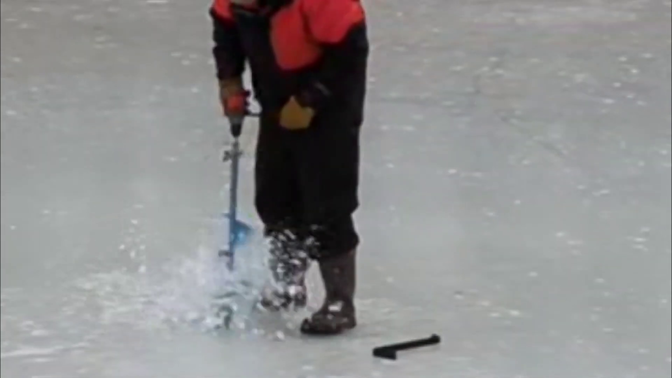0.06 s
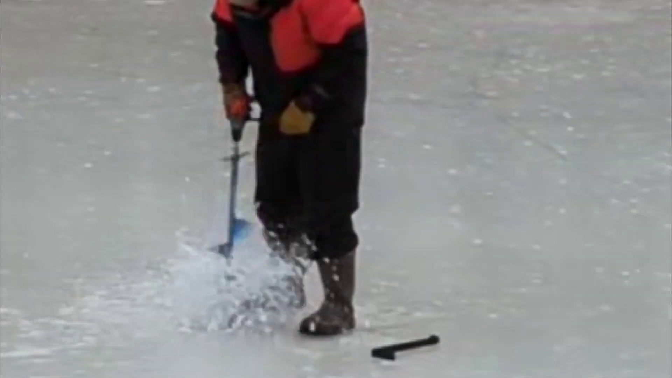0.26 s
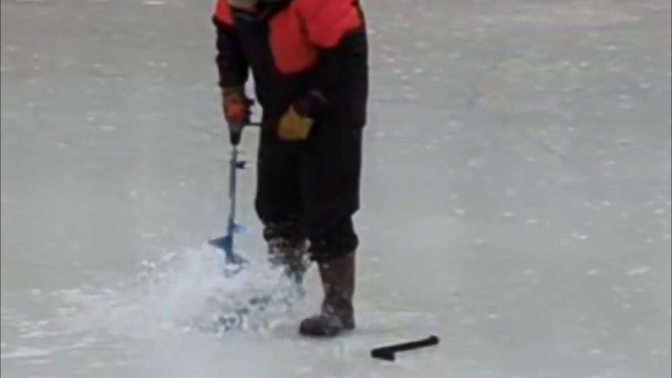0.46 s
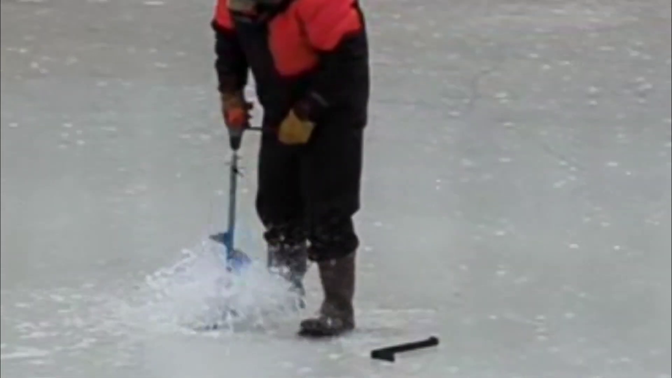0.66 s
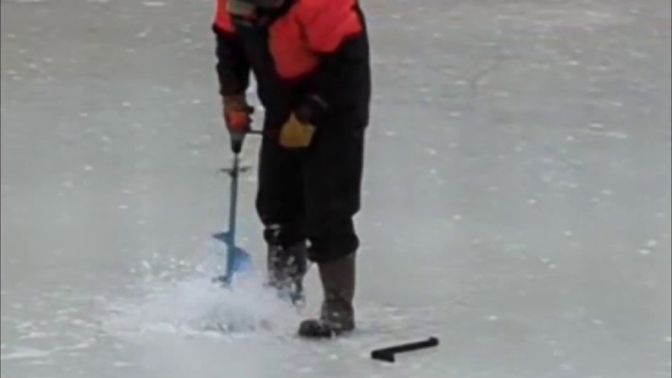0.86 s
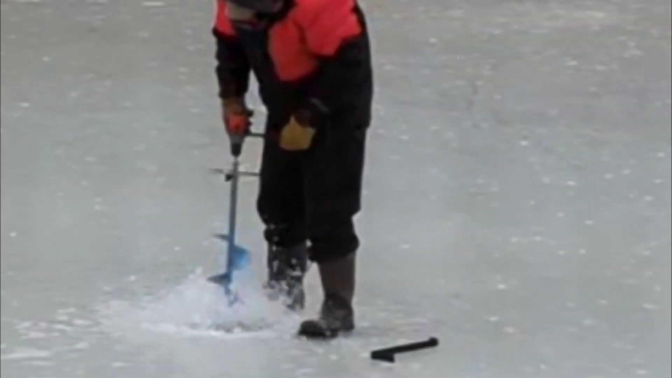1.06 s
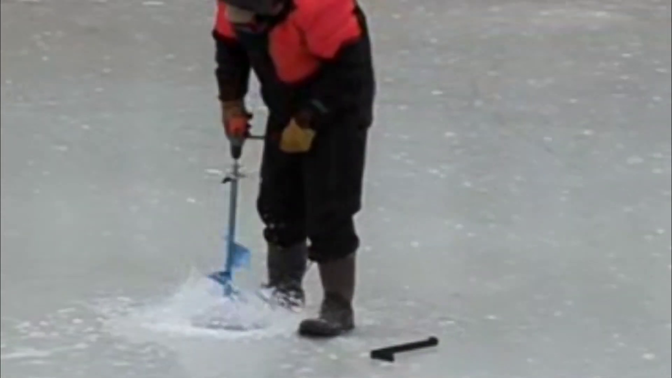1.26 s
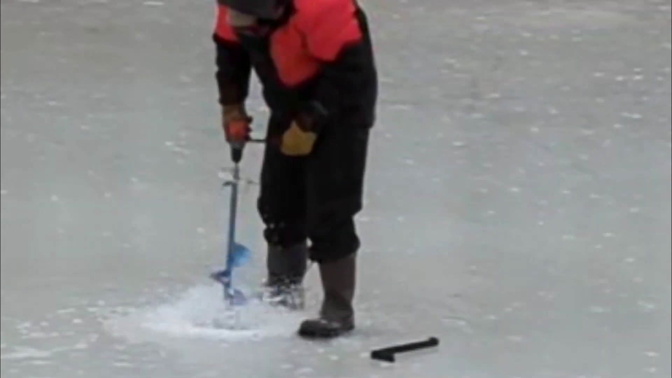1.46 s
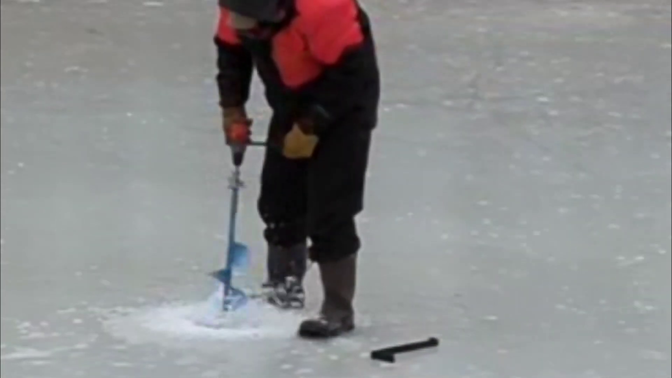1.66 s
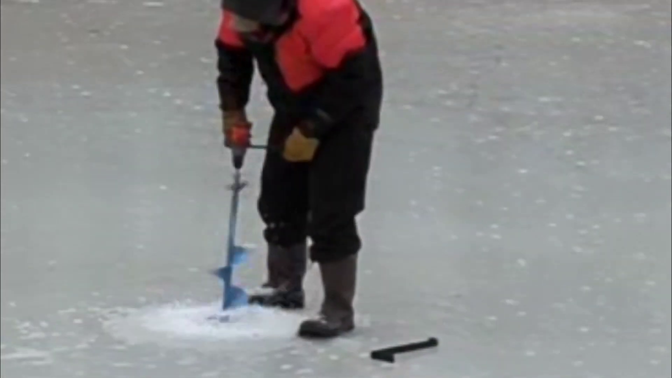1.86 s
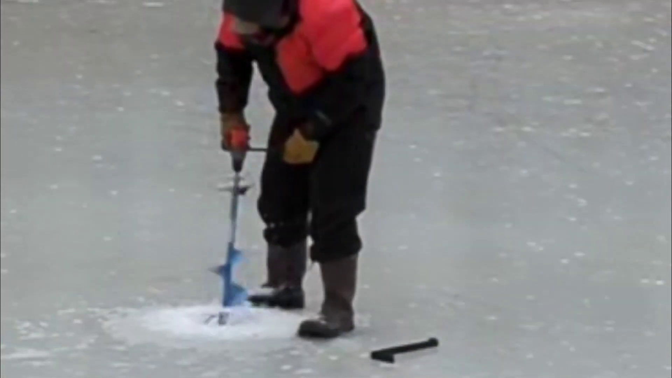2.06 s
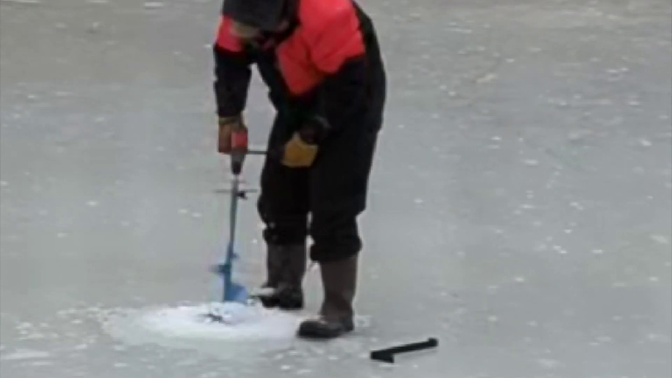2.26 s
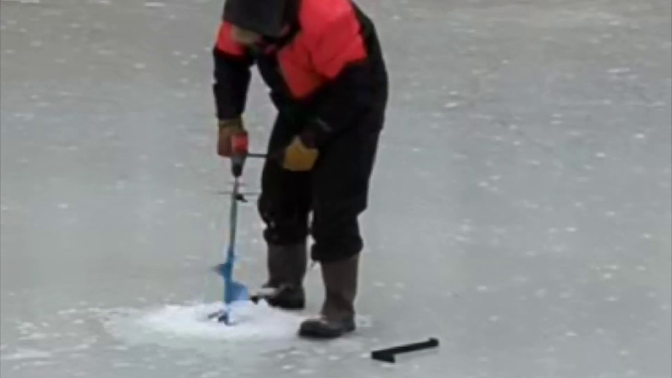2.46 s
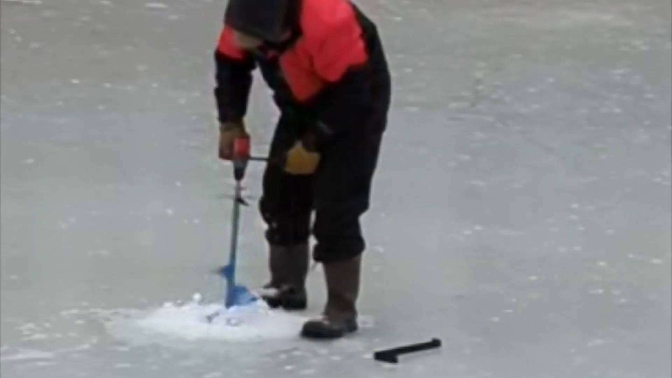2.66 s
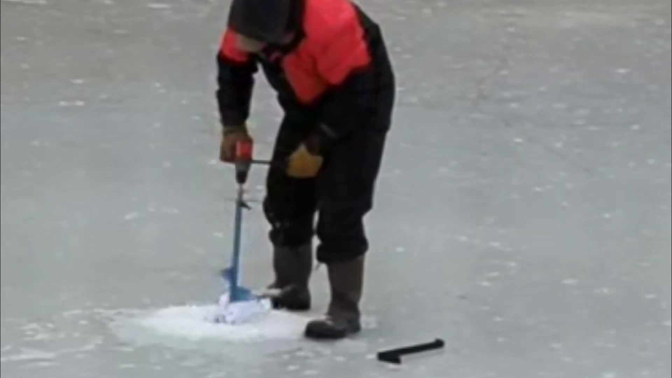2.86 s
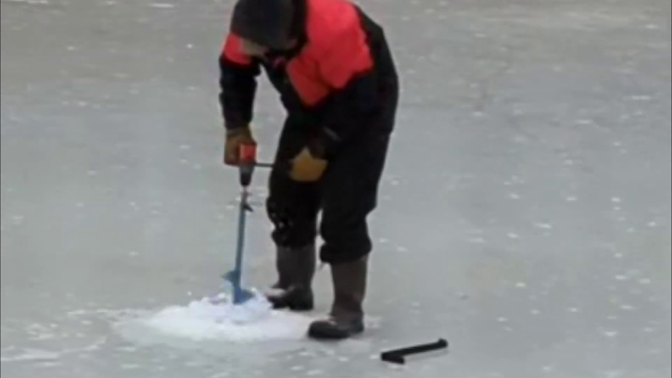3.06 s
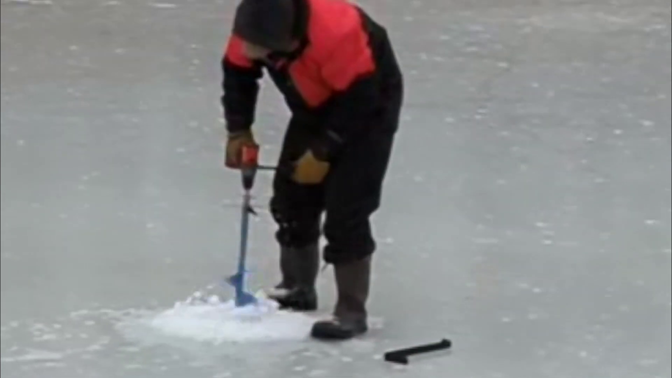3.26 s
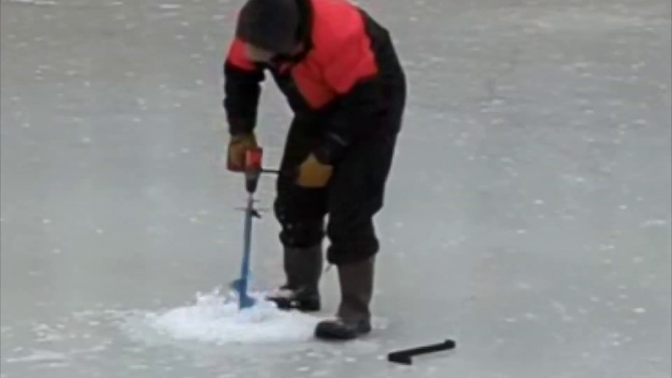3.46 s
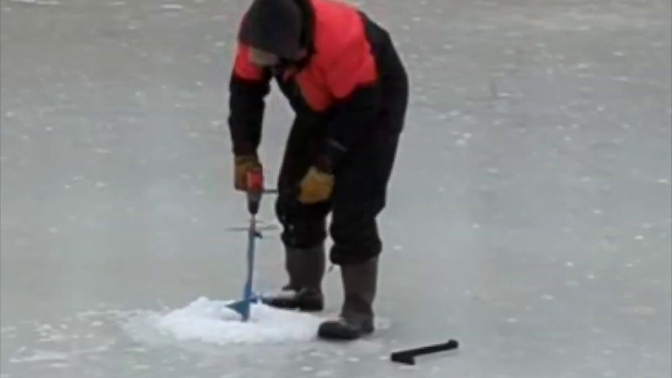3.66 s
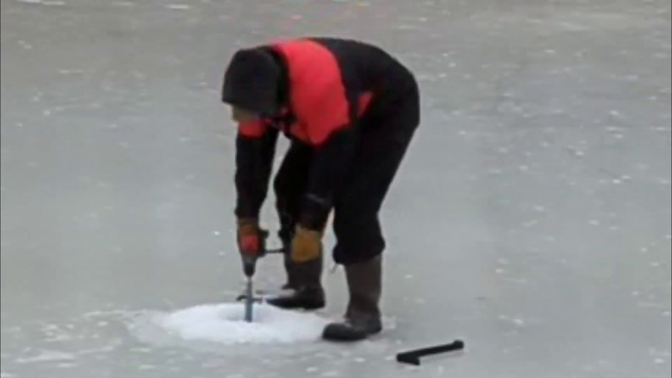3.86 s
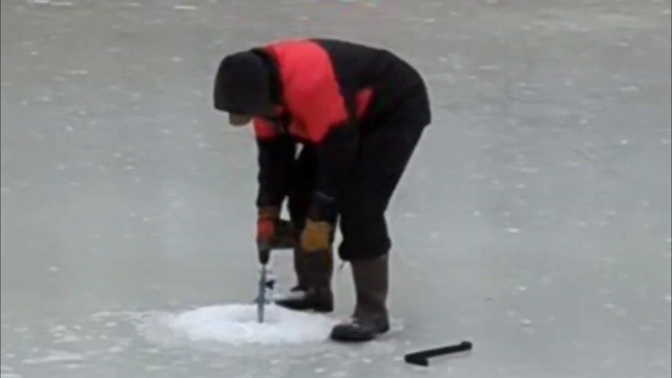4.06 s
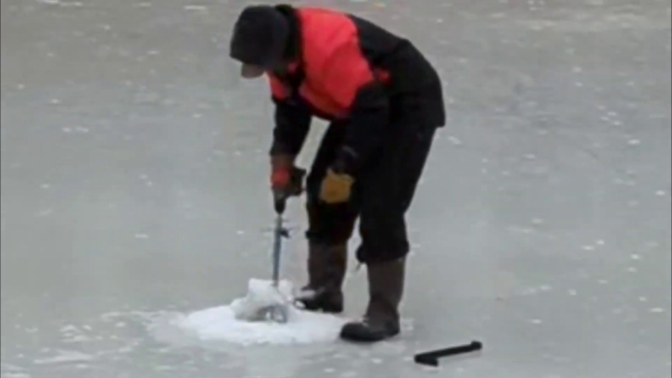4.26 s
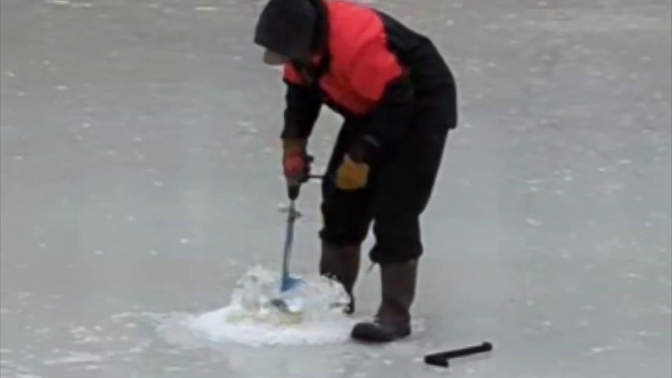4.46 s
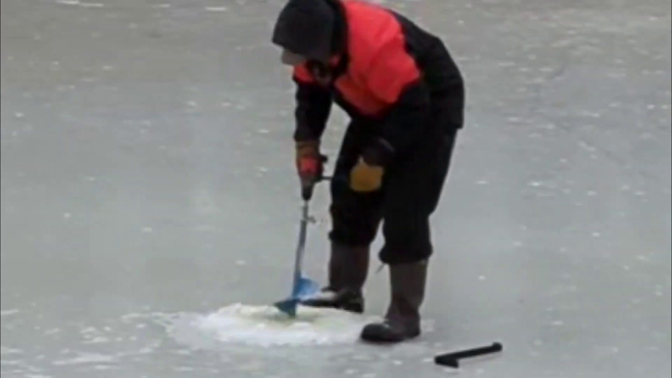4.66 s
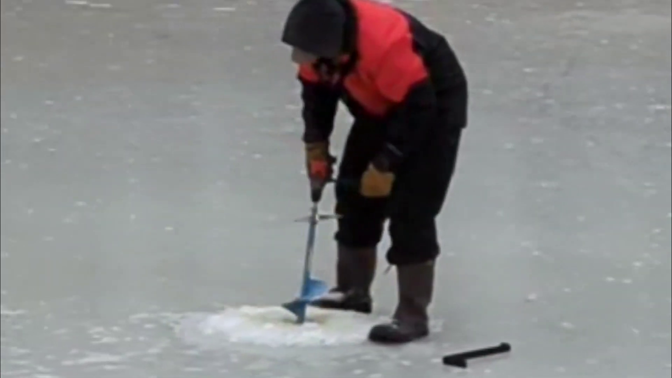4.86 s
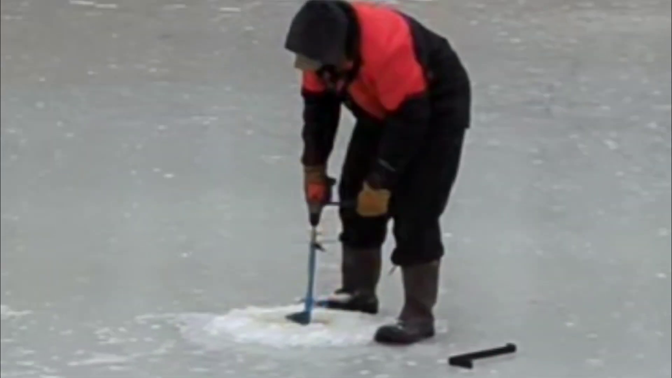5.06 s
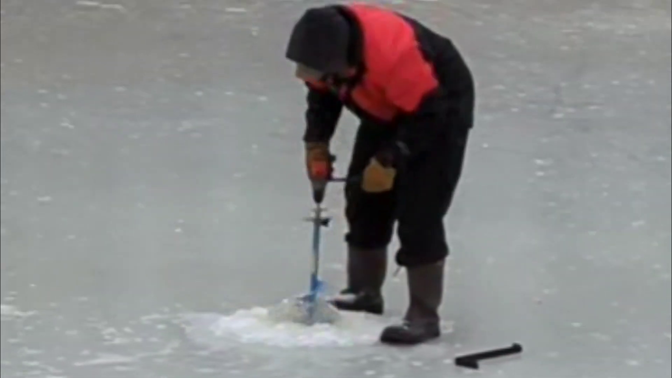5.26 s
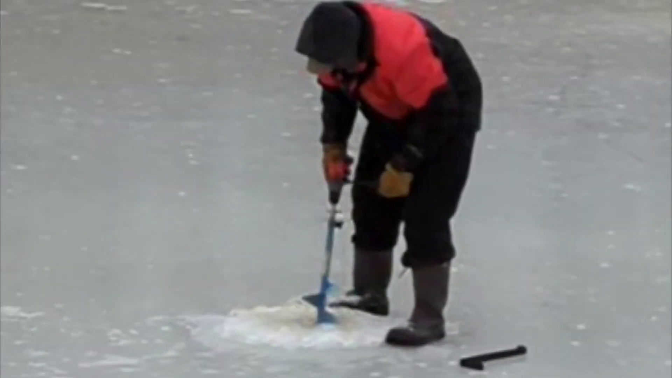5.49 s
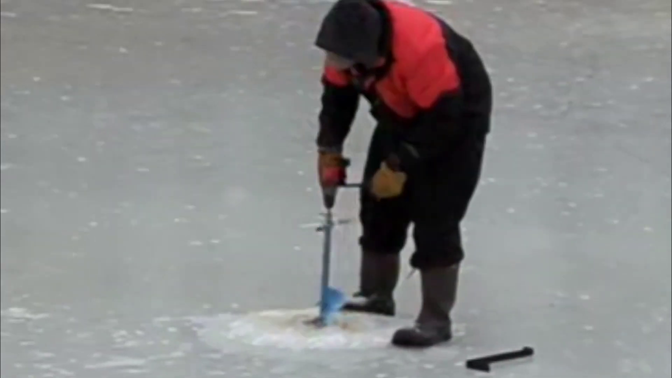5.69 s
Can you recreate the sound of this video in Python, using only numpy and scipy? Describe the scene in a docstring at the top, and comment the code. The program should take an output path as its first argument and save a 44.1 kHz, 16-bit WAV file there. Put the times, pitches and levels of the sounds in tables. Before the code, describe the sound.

Outdoors on a frozen lake, an electric auger grinds crisply through ice, punches through, then churns water in two short splashing bouts.

```python
"""A cordless drill turns an auger through lake ice, a few metres from a stereo microphone.
Geared tones ring the drill's case; the blades shave ice as showers of tiny fractures, with ringing flights.
The deepening hole knocks and resonates lower and lower, until the auger breaks through with a boom.
The freed auger then throws up water in two bouts: swelling gulps, noisy slush, clinks of the steel.
The open lake lies behind it all as a low filtered noise, and ice and shore return a sparse echo."""
import sys
import numpy as np
from scipy import signal
from scipy.fft import rfft, irfft
from scipy.io import wavfile
from scipy.ndimage import uniform_filter1d

SR = 44100
rng = np.random.default_rng(int(sys.argv[2]) if len(sys.argv) > 2 else 0)


def unload_wav(signal):
    """Save mono or channel-first audio to the path in sys.argv[1] as 16-bit WAV at rate SR, clipped to [-1, 1]."""
    wavfile.write(
        sys.argv[1],
        SR,
        np.round(np.clip(np.atleast_2d(signal).T, -1, 1) * 32767).astype(np.int16),
    )


N = 252693
T = np.arange(N) / SR
BREAKTHROUGH_S = 3.78
TEETH = 11  # gear mesh cycles per turn of the motor shaft

# colour of low grinding and sloshing: (frequency [Hz], relative level [dB])
GRIND_COLOUR = [(30, -39), (60, -29), (120, -7), (200, -31), (260, -18), (330, -2), (415, 4.5), (500, 4.5),
                (565, -8), (630, 3.5), (725, 5.5), (810, -9), (900, -12.5), (1200, -3.5), (2000, -40.5)]
# colour of cracking ice: (frequency [Hz], relative level [dB])
CRACK_COLOUR = [(1000, -13), (3000, -4), (4200, -4), (5400, 6), (6600, -1), (8000, 0.5), (10200, -8),
                (11200, -27), (12100, -20), (15000, -38)]
# modes of the auger's steel: (frequency [Hz], relative level [dB], t60 before wet damping [s])
STEEL_MODES = [(2720, -0.5, 0.42), (3420, -7, 0.85), (4054, -1, .75), (4760, -8.5, 0.72),
               (5050, -3.5, 0.35), (5660, -4.5, 0.49), (5930, 6.5, 0.066), (7486, 7.5, 0.27),
               (8200, -4, 0.61), (8064, -6, 0.26), (8230, -10, 0.35), (8570, -5.5, 0.39), (9430, -2, 0.3),
               (10210, -4.5, 0.42), (12030, -2, 0.087)]


def amp(db):
    """Decibels to amplitude."""
    return 10 ** (np.asarray(db) / 20)


def unit(x):
    """Scales to rms 1."""
    return x / np.sqrt(np.mean(x ** 2) + 1e-20)


def read(points, hz):
    """A spectrum table on a log-frequency axis."""
    f, value = np.transpose(points)
    return np.interp(np.log(hz + 1), np.log(f + 1), value)


def curves(rows):
    """The columns of a time table, one value per sample."""
    s, *columns = np.transpose(rows)
    return [np.interp(T, s, c) for c in columns]


def lapse(s):
    """Seconds since s, zero before it."""
    return np.maximum(T - s, 0)


def during(start, end):
    """1 from start to end, with soft edges."""
    return uniform_filter1d(1. * ((T >= start) & (T <= end)), 400)


def swell(t, peak_s):
    """Rises softly to 1 at peak_s, then dies away."""
    return (t / peak_s * np.exp(1 - t / peak_s)) ** 2


def add(mix, s, sound):
    """Mixes a sound in place, starting at s seconds."""
    part = mix[max(round(s * SR), 0):][:len(sound)]
    part += sound[:len(part)]


def filtered(x, points):
    """A causal minimum-phase filter with the given spectrum; its peaks ring on."""
    log_gain = np.log(amp(read(points, abs(np.fft.fftfreq(4096, 1 / SR)))))
    taps = np.fft.ifft(np.exp(np.conj(signal.hilbert(log_gain)))).real[:2048]
    return signal.oaconvolve(x, taps)[:len(x)]


def colour(x, points):
    """Filtered to the given spectrum, rms 1."""
    return unit(filtered(x, points))


def wander(hz):
    """Slow chance up to about the given rate, rms 1."""
    f = np.fft.rfftfreq(N // 16 + 2, 16 / SR)  # drawn at a sixteenth of the sample rate
    slow = irfft(rfft(rng.standard_normal(N // 16 + 2)) / (1 + (f / hz) ** 4))
    return unit(np.interp(np.arange(N) / 16, np.arange(len(slow)), slow))


def resonate(x, hz, width_hz):
    """A resonance that follows the curve hz: shifted down to zero, smoothed, shifted back."""
    turn = np.exp(2j * np.pi * np.cumsum(hz) / SR)
    r = np.exp(-np.pi * width_hz / SR)
    return 2 * (turn * signal.lfilter([1 - r], [1, -r], x / turn + 1e-18)).real


def grains(per_s, spread_db):
    """Random tiny impacts of either sign and uneven size, rms 1."""
    size = amp(spread_db * np.minimum(rng.exponential(1, N), 5))
    return unit(size * rng.choice([-1., 1.], N) * (rng.random(N) < per_s / SR))


def against_steel(x, t60_s):
    """Small impacts wake the auger's modes, damped by the ice packed around it."""
    t = np.arange(4000) / SR
    ring = sum(amp(db) * np.sin(2 * np.pi * hz * t) for hz, db, _ in STEEL_MODES)
    return unit(signal.oaconvolve(x, ring * amp(-60 * t / t60_s))[:N])


def motor():
    """Gear mesh Hz and whine dB: a loaded run through the ice, then freed runs that spin up and coast down."""
    # the drill's speed while it bores, dipping as the blades take hold: (time [s], gear mesh [Hz])
    boring_speed = [(0, 2877), (.07, 2965), (.128, 2977), (.168, 2850), (.21, 2480), (.268, 2858),
                    (.315, 2937), (.41, 2947), (.5, 2923), (.595, 2962), (.69, 2910), (.775, 2852),
                    (.87, 2649), (2.15, 2667), (3.1, 2440), (3.23, 2319), (3.66, 2296), (3.78, 2200)]
    # the freed motor racing at the breakthrough, then pulls of the trigger: (time [s], length [s],
    # gear mesh [Hz], spin-up [s], coasting [s], whine at full speed [dB])
    freed_runs = [(3.787, 0.24, 3687, 0.064, .145, -28), (4.168, 0.23, 2760, 0.016, .14, -49),
                  (4.392, 0.093, 2845, 0.0116, .14, -34.5), (5.154, 0.132, 3260, 0.038, .21, -24.5),
                  (5.447, .15, 2185, 0.025, .14, -32.5), (5.625, 0.066, 2262, 0.023, .14, -25.5)]
    start_db, sag_db_per_khz = -24.5, 19  # the whine weakens as the motor slows
    spin_up_db = 32  # rise of the whine from rest to full speed
    overrun_db, coast_db_per_s = 5, 139  # on release the auger drives the gears, which sing out and fade
    hz, = curves(boring_speed)
    level_db = start_db - sag_db_per_khz * (hz[0] - hz) / 1000
    for s, length, top_hz, spin_up, coast, db in freed_runs:
        released = lapse(s + length)
        held = lapse(s) - released
        driven = top_hz + (np.interp(s, T, hz) - top_hz) * np.exp(-held / spin_up)
        hz = np.where(T < s, hz, driven * np.exp(-released / coast))
        short_of_speed = np.clip(1 - driven / top_hz, 0, 1)
        coasting_db = overrun_db * (released > 0) - coast_db_per_s * released
        level_db = np.where(T < s, level_db, db - spin_up_db * short_of_speed ** 2 + coasting_db)
    return hz, uniform_filter1d(level_db, size=400)


def gears(shaft_hz, level_db):
    """Tones locked to the motor shaft ring the case as they sweep past; unloaded teeth chatter more."""
    # gear and rotor tones: (multiple of the shaft, relative level [dB], change once unloaded [dB])
    orders = [(4, 4, -0.5), (5, 2, -0.5), (6, 1, -1), (7, -5, -0.5), (11, 2, -0.5), (14, 0.5, 0.5),
              (26, 2, -8.5)]
    # how the drill's case radiates: (frequency [Hz], gain [dB])
    case = [(300, -36), (900, -25), (1500, -17.5), (2300, -15), (2700, -6), (2840, 4.5), (2960, 2),
            (3100, -23), (3400, -10.5), (3750, -32), (4500, -31), (7000, -23), (8600, -2), (12000, -25)]
    case_ring_hz, case_ring_width_hz = 2780, 180  # the rattling gears excite the case's main resonance
    slack = np.clip((T - BREAKTHROUGH_S) / .05, 0, 1)  # 0 under load, 1 without
    turns = np.cumsum(shaft_hz * (1 + (.003 + .004 * slack) * wander(200))) / SR
    chatter_db = 1.2 * wander(35) + 2 * slack * wander(260)
    tones = np.zeros(N)
    for k, db, freed_db in orders:
        # without load the rotor tones flicker further; those near the gear mesh do not
        is_rotor = abs(round(k) - TEETH) > TEETH / 3
        freed_change_db = slack * (freed_db + 3.5 * wander(50) * is_rotor)
        tone = np.sin(2 * np.pi * (round(k) * turns + rng.random()))
        tones += amp(db + freed_change_db + 2.0 * wander(65)) * tone
    ring_hz = np.full(N, 1. * case_ring_hz)
    rattle = resonate(rng.standard_normal(N), ring_hz, case_ring_width_hz)
    rattle = unit(resonate(rattle, ring_hz, case_ring_width_hz))
    drive = amp(level_db + chatter_db - slack)
    return filtered(np.sqrt(2) * drive * tones, case) + amp(-16 - 3.0 * slack) * drive * rattle


def cutting_levels(auger_turns, ream_fade_db_per_s=63):
    """Scraping, chip and grinding dB: set by depth, swung by each turn and crunch, cut by the breakthrough."""
    # the scraping dulls and the grinding grows as the blades sink:
    # (time [s], scraping [dB], fine chips [dB], low grinding [dB])
    cut_levels = [(0, -19.5, -21.5, -42), (.5, -19.5, -23.5, -40.5), (1.0, -21.5, -24.5, -30.5),
                  (1.9, -23, -27.5, -33), (2.3, -25, -29.5, -31), (3.0, -26.5, -31.5, -27),
                  (3.78, -28.5, -34.5, -27)]
    # the blades catch and break out a lump: (time [s], half length to 1/e [s],
    # scraping change [dB], fine chips change [dB], low grinding change [dB])
    crunches = [(0.431, 0.027, 3, -1, 6), (1.483, 0.0066, 4, 0, -7), (2.885, 0.034, -0.5, -1.5, 2),
                (3.6, 0.068, 1, 0, 0.5), (3.793, 0.026, 7, 5, 11.5), (3.876, 0.031, 0, 1, 14.5)]
    scrape_db, chips_db, grind_db = curves(cut_levels)
    push = np.sin(2 * np.pi * auger_turns) * (T < BREAKTHROUGH_S)
    push_db = (-0.26 + 0.45 * T) * push  # the swing grows with depth
    past = lapse(BREAKTHROUGH_S)
    levels = np.array([scrape_db + push_db - ream_fade_db_per_s * past,
                       chips_db + 0.24 * push_db - 0.18 * ream_fade_db_per_s * past,
                       grind_db + push_db - 0.5 * push - 12.5 * np.minimum(past / 0.068, 1)])
    for s, half, *changes_db in crunches:
        levels += np.outer(changes_db, np.exp(-((T - s) / half) ** 2))
    return levels


def blades(auger_turns):
    """Ice fractures in dense, clumped chips whose level swings with each turn; the flights ring with it."""
    # colours of the scraping and the fine chips: (frequency [Hz], relative level [dB])
    scrape_colour = [(200, -41.5), (500, -7.5), (900, -10.5), (1170, -9), (1500, -1), (1800, -2),
                     (2080, 1.5), (2450, 4), (3000, -6.5), (3350, -10.5), (3700, -9), (4500, -9),
                     (7000, -58.5)]
    chips_colour = [(1500, -35), (3500, 6.5), (4200, 6.5), (5300, -1), (6000, 1), (7400, 3), (7900, -6),
                    (8700, -4.5), (9200, -8), (10600, -6), (11500, -24), (13000, -13.5), (15200, -56)]
    # resonances of the auger's flights: (frequency [Hz], width [Hz], relative level [dB])
    flights = [(624.4, 11.3, 1), (923, 97, -5.5), (1140.4, 22.5, -0.5), (1277, 29, -5), (1771, 69, 0.5),
               (2066, 31, 4.5), (2894, 27, 1), (3398, 20, -4)]
    flight_drift = 0.015  # packed chips shift their pitch by this share, rms
    ream_s = 0.327  # past the breakthrough the blades only ream the wall
    scrape_db, chips_db, grind_db = cutting_levels(auger_turns)
    bite = amp(.8 * wander(17) + .9 * wander(70) + .25 * wander(360))
    cracks = grains(per_s=4200, spread_db=1.5) * bite
    ringing = np.zeros(N)
    for hz, width, db in flights:
        impacts = grains(per_s=1300, spread_db=-2.0) * bite
        ring = unit(resonate(impacts, hz * (1 + flight_drift * wander(9.6)), width))
        ringing += amp(db + 2.26 * wander(12.4)) * ring
    ringing = signal.sosfilt(signal.butter(2, 700, "high", fs=SR, output="sos"), unit(ringing))
    scrape = amp(scrape_db) * (colour(cracks, scrape_colour) + amp(-1.0) * ringing)
    fines = cracks + 1.02 * grains(per_s=15000, spread_db=0.0)
    chips = colour(fines, chips_colour) + amp(-10.0) * against_steel(fines, t60_s=0.09)
    grind = amp(grind_db) * colour(grains(per_s=1000, spread_db=2.0) * bite, GRIND_COLOUR)
    return during(0, BREAKTHROUGH_S + ream_s) * (scrape + amp(chips_db) * chips + grind)


def hole(auger_turns):
    """A pipe closed by ice: odd resonances fall as it deepens, sway with the flights and boom under lumps."""
    # lumps of slush drop back and thump the air in the hole: (time [s], level at peak [dB], swell [s])
    thump_times = [(1.122, -29, 0.009), (1.176, -27, 0.015), (1.368, -24, 0.02), (1.518, -28.5, 0.017),
                   (1.573, -29, 0.012), (1.73, -26.5, 0.021), (1.923, -31, 0.018), (2.11, -39, 0.014)]
    start_m, feed_start_s, feed_m_per_s = 0.1389, 0.728, 0.1108  # the air column lengthens as the auger sinks
    flood_m_per_s = 0.14  # after the breakthrough water rises and shortens it
    length_m = start_m + feed_m_per_s * (lapse(feed_start_s) - lapse(BREAKTHROUGH_S))
    length_m = np.maximum(length_m - flood_m_per_s * lapse(BREAKTHROUGH_S), start_m)
    hz = 343 / (4 * length_m)  # quarter wave
    # the ring builds up while the hole is shallow, and weakens once chips choke it
    shallow_db = 15.5 * np.maximum(1.13 - T, 0)
    choke_db = 12 * lapse(1.54)
    boring = during(0, BREAKTHROUGH_S) * amp(-37.5 - shallow_db - choke_db)
    # the whole hole booms as its bottom gives way
    rise = np.maximum(BREAKTHROUGH_S - T, 0) / 0.05
    fall = (lapse(BREAKTHROUGH_S) / 0.52) ** 2
    thud = amp(-43) * np.exp(-rise - fall)
    boom = np.sin(2 * np.pi * np.cumsum(hz * (1 + 0.0501 * wander(60.6))) / SR)
    boom = unit(boom * (1 + 0.34 * wander(76)))
    thumps = boom * sum(amp(db) * swell(lapse(s), swell_s) for s, db, swell_s in thump_times)
    sway = np.sin(2 * np.pi * auger_turns)  # the flights pass the mouth
    hz = hz * (1 + 0.042 * sway)
    drive = grains(per_s=3000, spread_db=-2.0)
    first = unit(resonate(resonate(drive, hz, 40), hz, 40))
    third = unit(resonate(resonate(drive, 3 * hz, 87), 3 * hz, 87))
    mouth_db = 3 * sway + wander(14)
    return (boring + thud) * amp(mouth_db) * (first + amp(-8.0) * third) + thumps


def open_lake():
    """The air over the lake: steady noise, strongest in the bass and low mids."""
    # colour of the open lake: (frequency [Hz], relative level [dB])
    air_colour = [(25, -33), (42, -11), (62, 4), (90, 2), (125, 1), (170, -10), (270, -10.5), (350, -0.5),
                  (415, 1.5), (560, -6), (700, 1), (850, -12.5), (2500, -15.5), (4000, -19.5),
                  (10000, -28.5), (15000, -30)]
    return amp(-43.0) * colour(rng.standard_normal(N), air_colour)


def knocks_and_gulps():
    """Knocks while boring, later gulps of water: each swells and rings, with an added upper tone."""
    # knocks up to the breakthrough, gulps after it:
    # (time [s], level at peak [dB], pitch [Hz], swell [s], upper tone relative to the ring [dB])
    ring_times = [(.962, -23.5, 617, 0.016, -19), (1.235, -30, 613, .013, -17), (1.93, -26, 608, .015, -23),
                  (2.722, -24, 620, 0.0069, -9), (2.872, -22.5, 713, 0.02, -20),
                  (3.115, -20, 712.4, 0.0035, -20), (3.141, -21, 699, .01, -20),
                  (3.565, -25, 703, 0.014, -13), (4.364, -19.5, 708, 0.0064, -12),
                  (4.372, -34, 420, 0.0062, -16), (4.455, -20, 440, 0.015, -15),
                  (4.519, -9, 388, 0.0053, -23), (4.543, -9.5, 385, 0.011, -11),
                  (4.561, -4.5, 414.6, 0.0094, -19), (4.602, -12, 394, 0.008, -16),
                  (4.621, -12.5, 392.3, 0.0067, -7.5), (5.252, -24, 416, 0.015, -16),
                  (5.31, -13, 375.7, 0.0072, -16), (5.341, -9, 380, 0.0049, -4),
                  (5.347, -8.5, 378, 0.01, -9.5), (5.426, -15, 329, 0.01, -7),
                  (5.455, -10, 400, 0.0078, -19), (5.688, -28.5, 382, 0.013, 3)]
    out, t = np.zeros(N), np.arange(6000) / SR
    for s, db, hz, swell_s, upper_db in ring_times:
        ring = np.sin(2 * np.pi * hz * t) + amp(upper_db) * np.sin(2 * np.pi * 712 * t)
        add(out, s, amp(db) * np.sqrt(2) * swell(t, swell_s) * ring)
    return out


def clinks():
    """The steel knocks on the rim and on loose ice: the ice cracks, and each contact wakes other modes."""
    # (time [s], ring level before damping [dB], crack level before its decay [dB])
    clink_times = [(3.786, -13.5, -17), (3.85, -28, -32), (3.896, -24, -31), (4.129, -30.5, -44),
                   (4.179, -19, -24), (4.224, -27, -22), (4.237, -34, -33), (4.258, -22, -46),
                   (4.305, -39, -26), (4.328, -25, -31), (4.368, -26, -41), (4.378, -17, -31),
                   (4.387, -22.5, -27), (4.461, -31, -26), (4.524, -21.5, -37), (4.54, -25, -27),
                   (4.6, -18, -29), (4.615, -15.5, -20), (4.626, -15.5, -33), (4.717, -30, -24),
                   (5.197, -40, -32.5), (5.347, -38, -22), (5.393, -27.5, -38), (5.45, -22, -27.5),
                   (5.467, -19.5, -44), (5.536, -23.5, -42), (5.574, -25, -49), (5.686, -23, -40)]
    out, t = np.zeros(N), np.arange(SR * 3 // 4) / SR
    hz, mode_db, t60 = np.transpose(STEEL_MODES)
    # slush damps the first swing quickly; water hastens the decay of every mode by 8 dB/s
    held = (.25 + .75 * np.exp(-t / .02)) * amp(-8 * t)
    for s, ring_db, _ in clink_times:
        share = amp(mode_db + 4 * rng.standard_normal(len(hz)))
        swing = np.sin(2 * np.pi * (np.outer(hz, t) + rng.random((len(hz), 1))))
        modes = amp(-60 * t / t60[:, None]) * swing
        ring = np.sqrt(2) * (share / np.linalg.norm(share)) @ modes * held
        # loose contact blurs the tones
        chatter = colour(rng.standard_normal(len(t)), [(0, 13), (150, -11), (500, -17), (2000, -68)])
        ring *= 1 + 0.5 * chatter * np.exp(-t / 0.049)
        add(out, s - .002, amp(ring_db) * (1 - np.exp(-t / 0.004)) * ring)
    cracking = np.zeros(N)
    for s, _, crack_db in clink_times:
        cracking += amp(crack_db) * np.minimum(lapse(s - .001) / 0.0017, 1) * np.exp(-lapse(s) / 0.0065)
    return out + cracking * colour(grains(per_s=7000, spread_db=1.0), CRACK_COLOUR)


def case_notes():
    """Short, slightly rough notes of the case, as gears slam or their tones sweep past its resonance."""
    # (time [s], level at peak [dB], pitch [Hz], swell [s])
    note_times = [(3.825, -15, 2878, 0.005), (4.177, -29, 2775, .016), (4.299, -29, 2745, .009),
                  (4.46, -21.5, 2870, 0.0058), (4.547, -30, 2860, 0.0071), (5.169, -25, 2867, 0.0074),
                  (5.188, -14.5, 2835, 0.0075), (5.233, -27, 2924, .006)]
    out, t = np.zeros(N), np.arange(6000) / SR
    for s, db, hz, swell_s in note_times:
        add(out, s, amp(db) * np.sqrt(2) * swell(t, swell_s) * np.sin(2 * np.pi * hz * t))
    return out * (1 + 0.14 * wander(169.7))


def slush():
    """Clumped droplets and crackling ice over low sloshing; each surge rises, holds and drains away."""
    # colour of the splashes: (frequency [Hz], relative level [dB])
    splash_colour = [(150, -10.5), (500, 2), (900, 0), (1170, -4), (1500, 1.5), (2200, 7), (3000, -3),
                     (3700, -8), (5500, -5.5), (8000, -11.5), (10200, -18), (11000, -22), (15000, -46)]
    # water and slush thrown up by the flights: (time [s], length [s], splash [dB], slosh [dB])
    surges = [(4.051, 0.059, -42, -28), (4.174, 0.06, -35.5, -32), (4.247, 0.507, -38, -40),
              (4.356, 0.041, -36, -23.5), (4.441, 0.06, -38, -23.5), (4.499, 0.044, -27, -20.5),
              (4.585, 0.033, -28.5, -23.5), (5.182, 0.13, -32.5, -31.5), (5.315, 0.022, -26, -15.5),
              (5.338, 0.023, -28, -20), (5.416, 0.041, -32, -17.5), (5.477, 0.39, -36.5, -36.5),
              (5.667, 0.035, -27, -32)]
    rise_s, fall_s = 0.0098, 0.019
    power = np.zeros((2, N))
    for s, length, *levels_db in surges:
        shape = np.minimum(lapse(s) / rise_s, 1) * np.exp(-lapse(s + length) / fall_s)
        power += np.outer(amp(levels_db), shape) ** 2
    splash_level, slosh_level = np.sqrt(power)
    clumps = amp(2.6 * wander(45))
    splash = splash_level * colour(grains(per_s=2200, spread_db=0.0) * clumps, splash_colour)
    slosh = slosh_level * colour(grains(per_s=640, spread_db=1.0) * clumps, GRIND_COLOUR)
    bits = grains(per_s=120, spread_db=3.0)  # loose bits of ice
    crackle = unit(colour(bits, CRACK_COLOUR) + 5.84 * against_steel(bits, t60_s=0.11))
    return splash + slosh + amp(-9) * splash_level * crackle


def shore(x):
    """Sparse reflections from ice and shore, different in each channel, each band dying at its own speed."""
    # decay of the echo: (frequency [Hz], t60 [s])
    echo_decay = [(200, 1.34), (700, 0.08), (2500, 1.45), (6000, 0.8), (12000, 0.75)]
    taps = rng.standard_normal((2, SR)) * (rng.random((2, SR)) < .1)
    hz, t, z = signal.stft(taps, SR, nperseg=256)
    tail = signal.istft(z * amp(-60 * t / read(echo_decay, hz)[:, None]), SR, nperseg=256)[1]
    return signal.fftconvolve(x[None], tail / np.linalg.norm(tail[0]), axes=1)[:, :N]


def microphone(x):
    """Two ports hear the sound in different phase, the left mostly leading; short waves arrive scattered."""
    # phase between the ports: (frequency [Hz], lead of the left [rad])
    port_lead = [(0, -0.5), (500, 0.32), (1250, 0.7), (1650, -0.1), (2200, 2.5), (2650, 3), (2900, 1.5),
                 (3350, 1.6), (3950, 3.5), (4450, 3.5), (5200, 5), (6200, 10), (7400, 11.5), (10200, 13.5),
                 (11000, 16.5)]
    # random phase between the ports: (frequency [Hz], scatter [rad rms])
    port_scatter = [(100, 0.065), (700, 0.14), (1400, 1), (4000, 0.57), (8000, 1), (14000, 0.96)]
    hz, _, z = signal.stft(x, SR, nperseg=512, noverlap=384)
    scatter = np.exp(.5j * read(port_scatter, hz)[:, None] * rng.standard_normal(z.shape))
    lag = np.exp(-1j * read(port_lead, hz))[:, None]
    ports = np.array([z * scatter, z * lag / scatter])
    return signal.istft(ports, SR, nperseg=512, noverlap=384)[1][:, :N]


def scene():
    """The motor's speed drives gears, blades and hole; the microphone hears all work, the lake and the echo."""
    mesh_hz, whine_db = motor()
    shaft_hz = mesh_hz / TEETH
    auger_turns = np.cumsum(shaft_hz) / SR / 45 + .42  # geared down 45 to 1, from a starting angle
    # while boring, the speed sways a little with each turn
    loaded_hz = shaft_hz * (1 - 0.004 * np.sin(2 * np.pi * auger_turns) * (T < BREAKTHROUGH_S))
    work = gears(loaded_hz, whine_db) + blades(auger_turns) + hole(auger_turns)
    work += knocks_and_gulps() + clinks() + case_notes() + slush()
    return microphone(work + open_lake()) + amp(-16.5) * shore(work)


def record(dry):
    """Clips at full scale, then limits the band to about 15 kHz."""
    low_pass = signal.firwin(511, 15050, window=("kaiser", 9), fs=SR)
    return signal.oaconvolve(np.clip(dry, -1, 1), low_pass[None], "same")


dry = scene()
out = record(dry)
unload_wav(out)
```